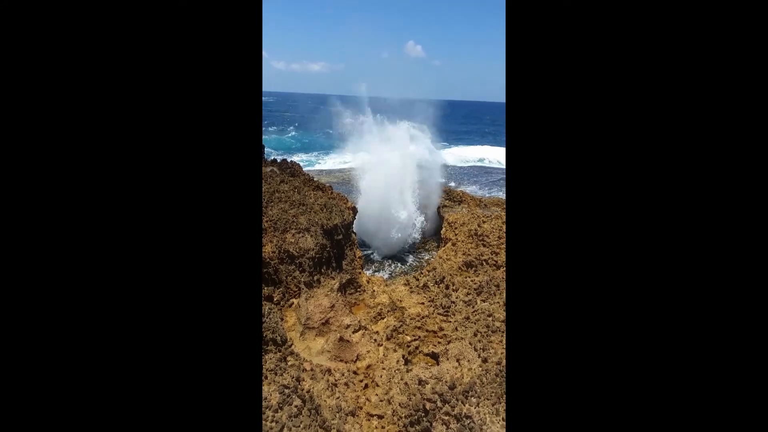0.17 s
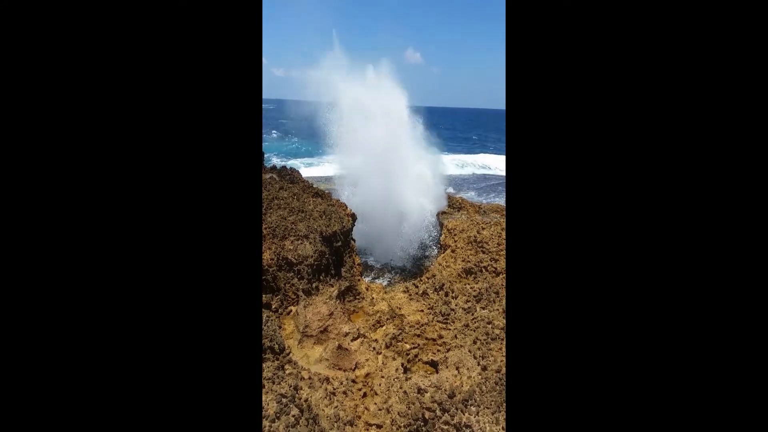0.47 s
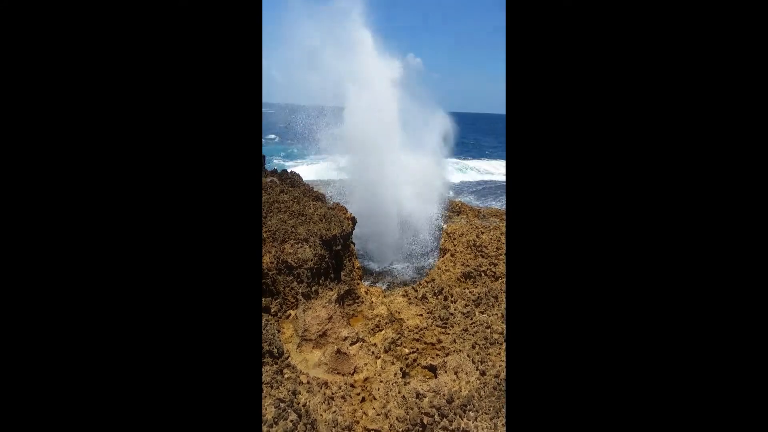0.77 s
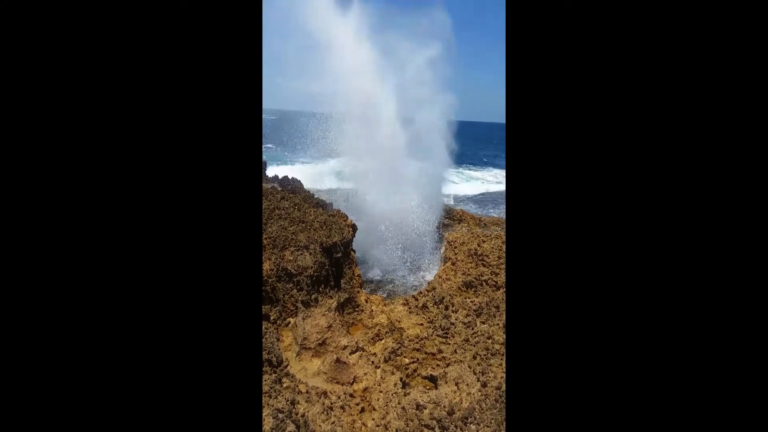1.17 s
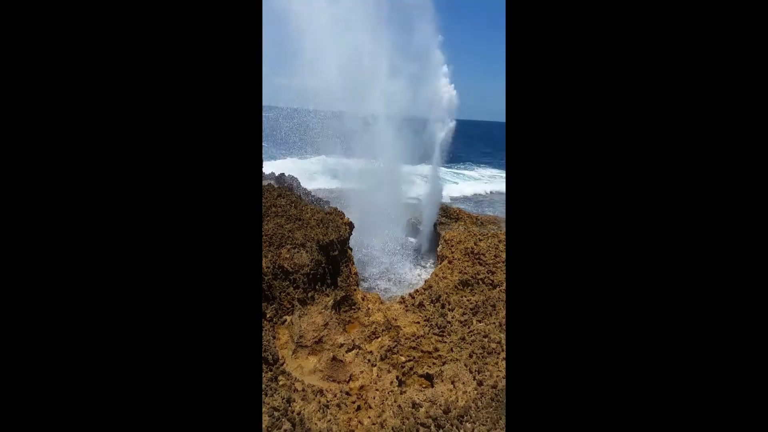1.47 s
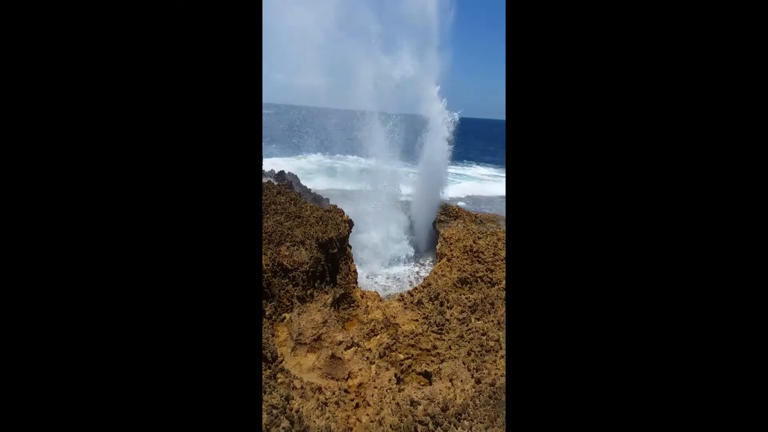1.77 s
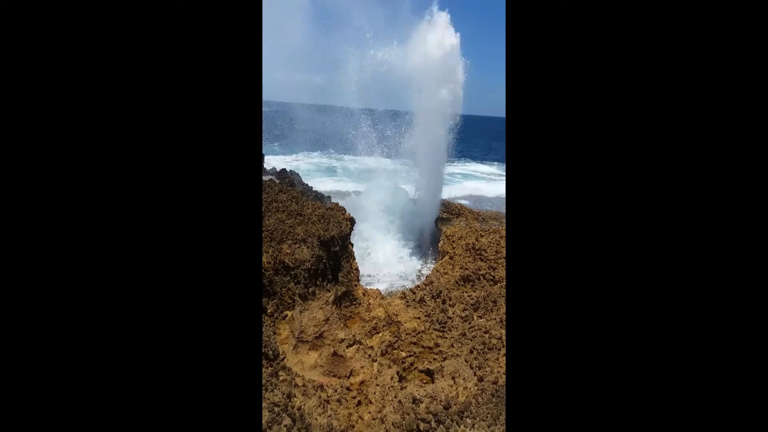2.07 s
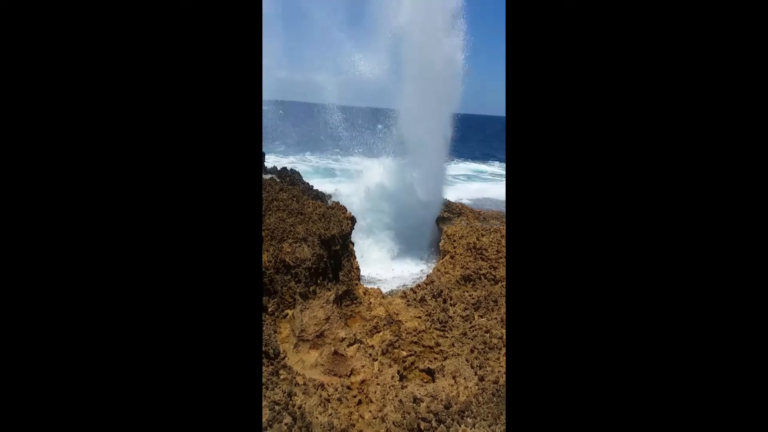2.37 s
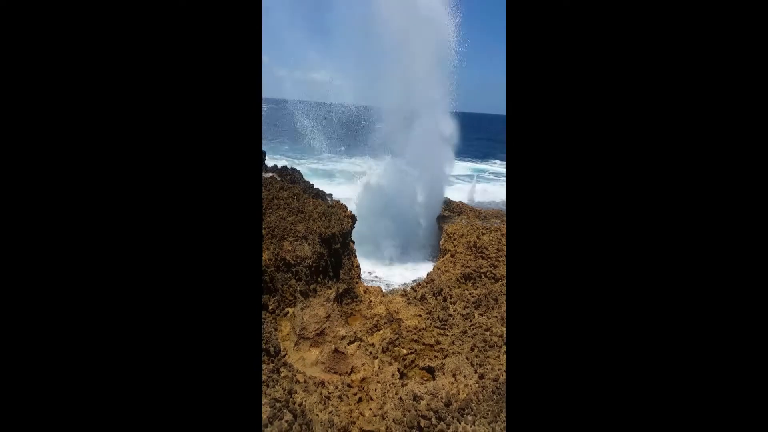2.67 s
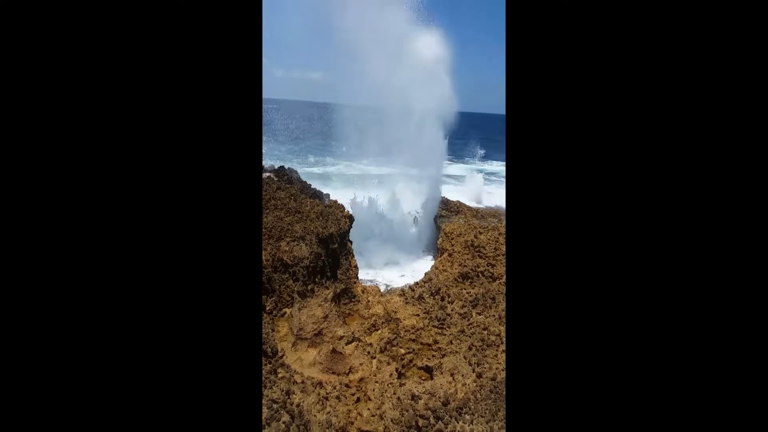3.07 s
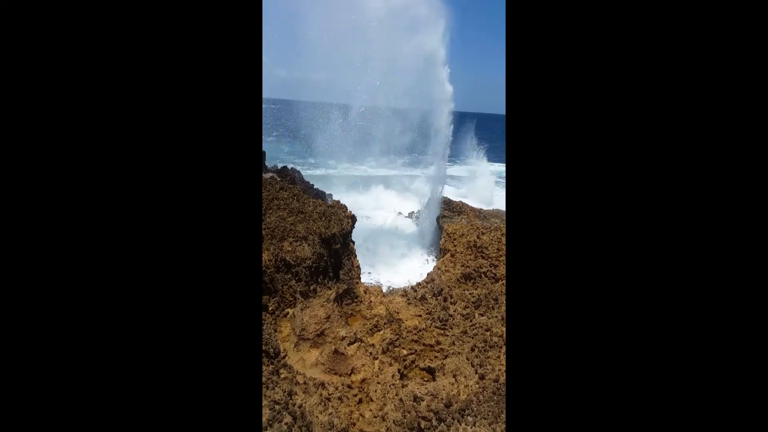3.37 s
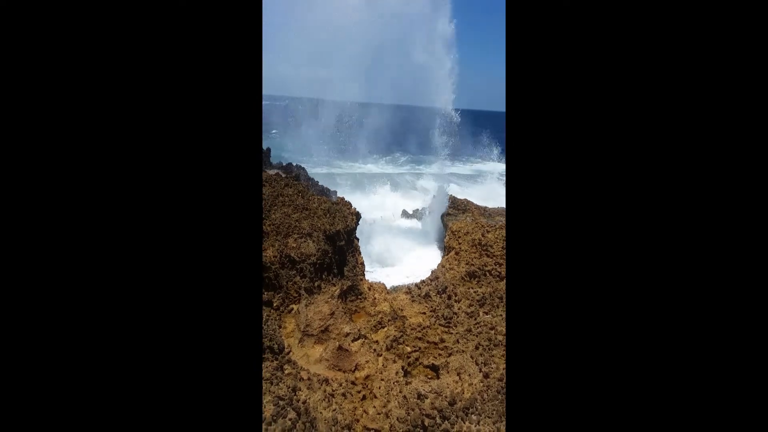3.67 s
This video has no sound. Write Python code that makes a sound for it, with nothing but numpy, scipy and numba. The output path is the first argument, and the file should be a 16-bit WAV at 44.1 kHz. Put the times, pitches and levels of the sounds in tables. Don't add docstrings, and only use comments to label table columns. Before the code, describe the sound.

A coastal blowhole booms deep and uneven, roaring and spraying as wind buffets the microphone.

```python
import sys
import numpy as np
from scipy import signal
from scipy.fft import rfft, irfft
from scipy.io import wavfile
from scipy.ndimage import uniform_filter1d
from numba import njit

SR = 44100
rng = np.random.default_rng(int(sys.argv[2]) if len(sys.argv) > 2 else 0)


def makeup_ratio(level_db):
    decades = np.asarray(level_db, float) / 20
    return 10 ** decades


def master_out(mix):
    frames = np.transpose(np.atleast_2d(mix))
    ceiling = np.clip(frames, -1, 1)
    pcm = np.round(ceiling * 32767).astype(np.int16)
    wavfile.write(sys.argv[1], SR, pcm)


N = 168462


def curve(table, axis=1):
    points = np.array(table)
    return np.interp(np.arange(N) / SR, points[:, 0], points[:, axis])


def unit(x):
    return x / np.sqrt(np.mean(x ** 2))


def walk(per_s):
    hold = max(int(SR / per_s), 1)
    steps = rng.standard_normal(2000)[np.arange(N) // hold % 2000]
    return 1.3 * uniform_filter1d(uniform_filter1d(steps, hold), hold)


@njit
def svf(x, hz, width, sr):
    y, band, low = np.empty(len(x)), 0., 0.
    for i in range(len(x)):
        g, k = np.tan(np.pi * hz[i] / sr), width / hz[i]
        v = (band + g * (x[i] - low)) / (1 + g * (g + k))
        band = 2 * v - band
        low = low + 2 * g * v
        y[i] = k * v
    return y


def ring(modes):
    slosh_db, slosh_per_s = 2.2, 18
    drift = 1 + 0.035 * walk(3.53)
    out = 0
    for hz, width, db in modes:
        tone = rng.standard_normal(N)
        for _ in range(2):
            tone = svf(tone, hz * drift, 1.49 * width, 1. * SR)
        out = out + makeup_ratio(db + slosh_db * walk(slosh_per_s)) * unit(tone)
    return unit(out)


def rush(colour, shared_db, own_db, alike, source=0):
    treble_alike, alike_hz = -0.35, 4270
    hz, points = np.fft.rfftfreq(N, 1 / SR) + 1, np.array(colour)
    levels = np.interp(np.log(hz), np.log(points[:, 0]), points[:, 1], left=-90, right=points[-1, 1] - 12)
    like = treble_alike + (np.clip(alike, 0, 1) - treble_alike) / (1 + (hz / alike_hz) ** 2)
    mid, side = rfft(rng.standard_normal((2, N)) + source) * makeup_ratio(levels)
    pair = np.sqrt(1 + like) * mid + np.sqrt(1 - like) * side * np.array([[1], [-1]])
    swell, out = walk(9.31), 0
    for octave in np.arange(4, 15):
        bell = np.cos(np.pi / 2 * np.clip(np.log2(hz) - octave, -1, 1)) ** 2
        out = out + irfft(pair * bell, N) * makeup_ratio(shared_db * swell + own_db * walk(4.44))
    return unit(out)


def cave():
    # start in seconds, level in dB, then the chamber, throat and
    # vent ringing in dB against the cave.
    pressure = [(0.0, -17.5, 0.5, -3, -3.5), (0.2, -17.5, -2.5, -4, -4.5), (0.4, -19.5, 1.5, -5.5, -4),
                (0.55, -15, -2, 0.5, -1.5), (0.8, -17, 4.5, 3.5, 1.5), (1.05, -18, 2, 2.5, -2),
                (1.18, -17.5, 2.5, 1, -2), (1.27, -22.5, 1.5, -9, -12.5), (1.42, -28.5, -3.5, -11.5, -23),
                (1.65, -25.5, -3, -7, -9.5), (1.83, -22, -3.5, -5.5, -10), (1.92, -18.5, 1, -4, -17),
                (2.1, -18.5, -5, -2, -7), (2.5, -20.5, 3.5, -1, -9.5), (2.95, -16, 1.5, 0, -5),
                (3.08, -22, 1.5, -6, -10.5), (3.5, -32, -1, -5, -12), (3.82, -26, -10, -9, 2.5)]
    # pitch in Hz, width in Hz, level in dB.
    low_modes = [(77, 39, -10), (107.7, 23.2, -4)]
    chamber_modes = [(143.7, 36.7, 0)]
    throat_modes = [(192, 27, 0), (217.7, 25, -1), (308.6, 42, -12.5)]
    vent_modes = [(257.8, 26.8, -1)]
    # time in
    # seconds, peak in dB, pitch in Hz.
    booms_and_gulps = [(0.024, -7, 114.8), (0.036, -8, 262.5), (0.086, -16, 133), (0.184, -14.5, 271),
                       (0.249, -22, 268), (0.323, -8, 117), (0.349, -9.5, 255), (0.4, -34, 253), (0.434, -6, 115),
                       (0.489, -20, 255), (0.525, -10.5, 167), (0.564, -10, 120), (0.619, -14, 260),
                       (0.624, -6.5, 159), (0.649, -6, 212), (0.713, -7.5, 266), (0.732, -3, 216), (0.747, -7, 126),
                       (0.797, -8.5, 195), (0.838, -9, 238), (0.843, -4, 148), (0.858, -19, 183), (0.914, -8, 226),
                       (0.923, -8, 264), (0.953, -10, 143), (0.982, -18, 195), (1.013, -6.5, 260), (1.013, -4.5, 228),
                       (1.062, -17, 213), (1.131, -10, 204), (1.147, -9.5, 146), (1.162, -5.5, 252),
                       (1.182, -9.5, 183), (1.198, -11, 140), (1.262, -16, 111), (1.902, -14.5, 130),
                       (1.951, -11, 115.5), (1.972, -11.5, 210), (2.03, -14.5, 197), (2.146, -11, 147),
                       (2.207, -9.5, 134), (2.334, -10, 166), (2.344, -4.5, 134.3), (2.399, -20, 190),
                       (2.604, -8, 174), (2.664, -11, 181), (2.794, -6, 168), (2.808, -7, 108), (2.893, -11.5, 160),
                       (2.933, -11, 240), (2.942, -10, 213), (2.988, -14.5, 259), (2.987, -8.5, 166),
                       (3.008, -10, 226), (3.013, -8, 136.4), (3.038, -10, 104),
                       (.505, -22.5, 680), (.69, -25, 700), (.865, -21, 436), (1.035, -17.5, 460),
             (1.135, -21.5, 1020), (2.55, -25, 657), (2.95, -29, 684), (1.614, -16.5, 117), (1.7, -15, 140),
             (2.215, -13, 249), (3.19, -10, 112)]
    boom_s, boom_hz, shorter = 0.033, 111, 0.57

    air = ring(low_modes)
    for column, modes in enumerate((chamber_modes, throat_modes, vent_modes), 2):
        air = air + makeup_ratio(curve(pressure, column)) * ring(modes)
    out = makeup_ratio(curve(pressure) + 1.0) * air
    t = np.arange(N) / SR
    for at, db, hz in booms_and_gulps:
        near = slice(max(int((at - .15) * SR), 0), int((at + .15) * SR))
        u = t[near] - at
        swell = np.exp(-(u / boom_s * (hz / boom_hz) ** shorter) ** 2)
        out[near] += makeup_ratio(db) * swell * np.cos(2 * np.pi * (hz * u + rng.random()))
    return out


def wind():
    # start in seconds, level in dB, left minus right in dB.
    strength = [(0, -33, 23), (.2, -16.5, -4.5), (.4, -29, 14), (.65, -20, 7), (1.0, -17.5, 7),
                (1.3, -38.5, 24), (1.58, -24, -4), (1.95, -21.5, 0.5), (2.35, -22.5, -3), (2.6, -14, 1),
                (2.9, -29.5, 13), (3.3, -21, 5.5), (3.5, -23, 9), (3.6, -26.5, -1), (3.65, -19.5, -7),
                (3.74, -22.5, 18.5), (3.82, -18, 7)]
    # frequency in Hz, level in dB.
    wind_colour = [(20, -11), (50, -4.5), (110, 0), (200, -1.5), (350, -18.5), (600, -22), (1200, -68)]
    flutter_colour = [(150, -6), (260, 0), (400, -6), (700, -17), (1200, -30)]
    # time in seconds, signed peak pressure (full scale 1),
    # port (0 left, 1 right), pitch in Hz.
    pops = [(1.5644, .25, 1, 260), (1.5773, .3, 1, 380), (1.5839, .4, 1, 600), (1.5873, -.3, 1, 200),
            (2.0994, .4, 1, 300), (2.1023, -.3, 1, 330), (2.1063, .75, 1, 520), (3.56, .3, 0, 200),
            (3.6209, -.7, 1, 520), (3.6236, .45, 1, 330), (3.6296, .9, 1, 480), (3.6502, -.7, 1, 190),
            (3.6571, .5, 1, 240), (3.6705, .35, 1, 200), (3.6681, .2, 0, 400), (3.6857, .45, 0, 230),
            (3.6914, .4, 0, 300), (3.7025, .5, 0, 230), (3.708, .45, 0, 190), (3.7312, .5, 0, 170),
            (3.735, -.4, 0, 170), (3.7423, .3, 0, 200), (3.7504, .4, 0, 270), (3.7549, .55, 0, 400),
            (3.7563, -.45, 0, 380), (3.772, -.5, 0, 330), (3.7797, -.4, 0, 480), (3.7816, .45, 0, 300),
            (3.7887, -.4, 0, 170), (3.8072, .85, 1, 240)]
    gust_db, gust_per_s, flutter_db, flutter_steep = 2.6, 34, -14, 1.4
    pop_cycles, rasp_db, rasp_s = 0.8, -19, 0.009

    gusts = makeup_ratio(gust_db * np.array([walk(gust_per_s), walk(gust_per_s)]))
    buffeting = unit(rush(wind_colour, 0.15, 1.0, 0.018) * gusts)
    flutter = makeup_ratio(flutter_db) * unit(rush(flutter_colour, 0.97, 0.4, 0.028) * gusts ** flutter_steep)
    side = np.array([[.5], [-.5]]) * curve(strength, axis=2)
    out = (buffeting + flutter) * makeup_ratio(curve(strength) + side)
    t = np.arange(N) / SR
    rasp = unit(svf(rng.standard_normal(N), np.full(N, 780.), 530.0, 1. * SR))
    for at, size, port, hz in pops:
        u = (t - at) * hz
        pop = np.exp(-np.abs(2 * u / pop_cycles) ** 1.2) * np.cos(2 * np.pi * u)
        rasp_level = makeup_ratio(rasp_db) * np.sign(size) * (hz / 480) ** 2
        out[int(port)] += size * (pop + rasp_level * rasp * np.exp(-((t - at) / rasp_s) ** 2))
    return out


def jet():
    # start in seconds, flow level in dB.
    flow = [(0, -29), (.4, -32.5), (.52, -26.5), (.68, -23.5), (.78, -26), (.97, -22), (1.16, -27.5),
            (1.24, -38), (1.9, -37), (2.2, -35.5), (2.3, -30.5), (2.36, -31), (2.55, -28.5), (2.68, -31),
            (2.9, -29), (3.02, -33.5), (3.3, -33.5), (3.82, -39.5)]
    # frequency in Hz, level in dB.
    roar_colour = [(250, -12), (450, -4.5), (560, -1), (700, 0), (850, -5.5), (1020, -3), (1500, -8.5),
                   (2300, -9)]
    hiss_colour = [(1400, -6), (2300, 10), (3200, 4.5), (4800, 0.5), (6200, -3), (8000, -46)]
    # pitch in Hz, width in Hz, level in dB.
    gurgle_modes = [(453, 88, 0), (703, 137, 0.5), (1062, 136, -4.5)]
    hiss_db, gurgle_db = -5.5, -5

    roar = rush(roar_colour, 1.1, 1.0, 0.99)
    hiss = makeup_ratio(hiss_db) * rush(hiss_colour, 0.46, 0.37, 0.96)
    gurgle = makeup_ratio(gurgle_db) * ring(gurgle_modes)
    return makeup_ratio(curve(flow) + 0.5) * (roar + hiss + gurgle)


def spray():
    # start in seconds, level of the falling spray in dB.
    falling = [(0, -37), (.12, -38.5), (.35, -35.5), (.68, -34), (.76, -50), (.95, -51), (1.17, -40),
               (1.26, -39.5), (1.62, -41), (2.0, -37), (2.4, -36), (2.65, -36.5), (2.87, -35.5),
               (3.0, -38.5), (3.06, -33.5), (3.5, -35.5), (3.62, -40.5), (3.82, -37.5)]
    # frequency in Hz, level in dB.
    spray_colour = [(700, 0.5), (2000, 4), (3000, 2.5), (4800, -3), (7000, -2), (10000, -1.5), (13000, 0),
                    (16000, -2.5)]
    # time in seconds, level in dB, length in seconds.
    sheets = [
        (.37, -35, .03),
        (2.29, -32, .025),
        (2.385, -32, 0.025),
        (3.093, -35, 0.015),
        (3.115, -29, .024),
    ]
    drops_per_s, drop_spread_db, drops_db = 4000, 2.5, -13
    sheet_hz, sheet_width_hz = 12700., 7100.

    lands = rng.random((2, N)) < drops_per_s / SR
    sizes = makeup_ratio(-drop_spread_db * np.log(rng.random((2, N)) + 1e-9))
    drops = makeup_ratio(drops_db) * unit(lands * sizes * rng.choice([-1, 1], (2, N)))
    hiss = makeup_ratio(curve(falling) + 6.5) * rush(spray_colour, 1.1, 0.37, 0.94, drops)
    t = np.arange(N) / SR
    slaps = sum(makeup_ratio(db) * np.exp(-((t - at) / length) ** 2) for at, db, length in sheets)
    noise = rng.standard_normal((2, N))
    fizz = np.array([unit(svf(n, np.full(N, sheet_hz), sheet_width_hz, 1. * SR)) for n in noise])
    return hiss + slaps * fizz


def surf():
    # frequency in Hz, level in dB.
    surf_colour = [(40, -35), (120, -6), (300, 6.5), (700, -10), (1500, -1.5), (2500, -25), (5000, -23),
                   (9000, -39)]
    return makeup_ratio(-43.5) * rush(surf_colour, 0.19, 0.8, 0.8)


def scene():
    return cave() + wind() + jet() + spray() + surf()


def shape(x, gain):
    wide = np.pad(x, ((0, 0), (2048, 2048)), "reflect")
    n = wide.shape[1]
    return irfft(rfft(wide) * gain(np.fft.rfftfreq(n, 1 / SR)), n)[:, 2048:-2048]


def microphone_ports(x):
    # frequency in Hz, width in Hz, level in dB.
    left_port = [(10260, 1630, -5), (14500, 3300, 3), (2760, 810, -2.5), (102, 82, 2.5)]
    right_port = [(11000, 580, -5.5), (3000, 740, -8.5), (5000, 660, 5.5), (7000, 380, -5),
                  (14000, 900, -5), (9800, 2000, -0.5)]
    lag_s, lag_top_hz = 0.000045, 4000

    def colour(port, hz):
        return makeup_ratio(sum(db * np.exp(-((hz - f) / width) ** 2) for f, width, db in port))

    def both(hz):
        lag = lag_s * np.exp(-(hz / lag_top_hz) ** 2)
        return np.array([colour(left_port, hz) * np.exp(-2j * np.pi * hz * lag), colour(right_port, hz)])

    return shape(x, both)


@njit
def follow(x, up, down):
    e, y = .1, np.empty(len(x))
    for i in range(len(x)):
        e += (x[i] - e) * (up if x[i] > e else down)
        y[i] = e
    return y


def gain_control(x):
    top_db, ratio, attack_s, release_s = -14, 1.415, 0.0013, 0.038
    loudness = follow(np.abs(x).max(0), 1 / (attack_s * SR), 1 / (release_s * SR))
    return x * np.minimum(makeup_ratio(top_db) / loudness, 1) ** (1 - 1 / ratio)


def band_limit(x):
    return signal.sosfilt(signal.butter(12, 16950, fs=SR, output="sos"), x)


def record(dry):
    top_hz = 15790
    x = gain_control(microphone_ports(dry))
    mix = shape(np.tanh(x), lambda hz: hz < top_hz)
    return band_limit(mix)


dry = scene()
out = record(dry)
master_out(out)
```